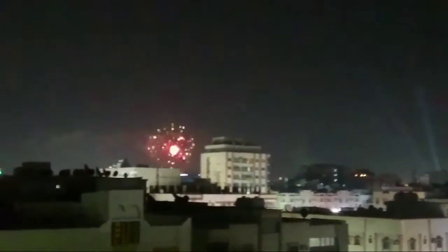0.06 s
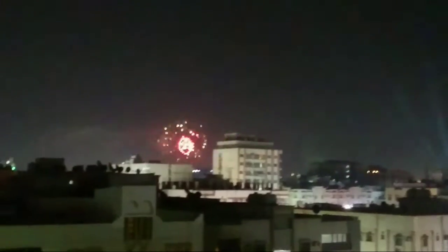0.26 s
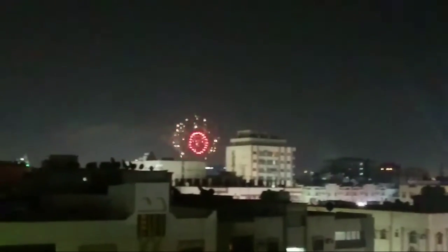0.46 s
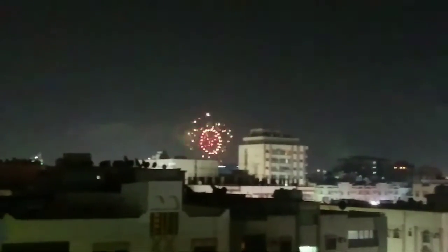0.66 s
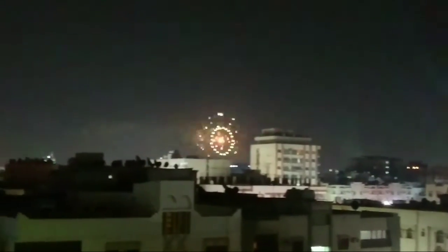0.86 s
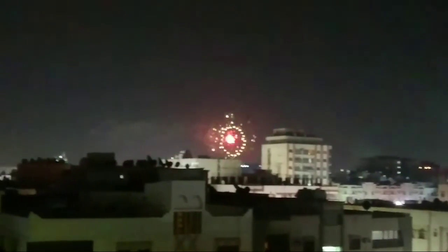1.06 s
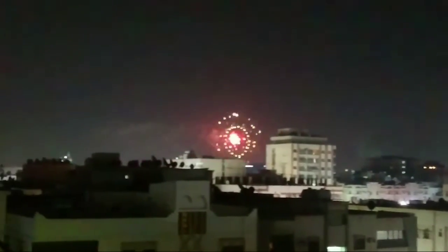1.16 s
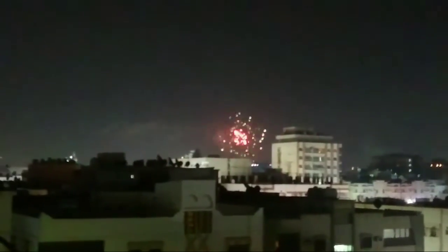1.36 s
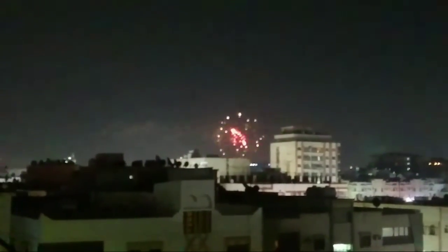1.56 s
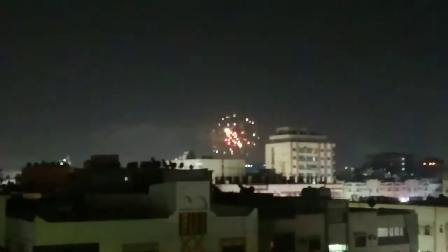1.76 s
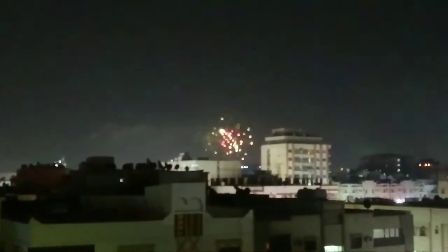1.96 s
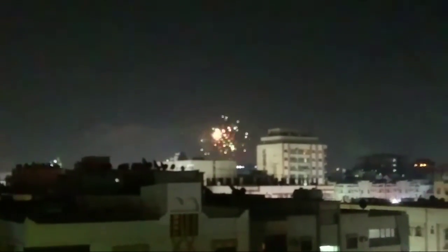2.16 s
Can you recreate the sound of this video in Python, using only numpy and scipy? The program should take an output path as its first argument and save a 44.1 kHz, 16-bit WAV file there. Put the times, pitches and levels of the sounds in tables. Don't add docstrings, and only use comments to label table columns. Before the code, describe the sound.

Far-off firework shells pop and boom in irregular clusters above faint city noise and hum

```python
import sys
import numpy as np
from scipy import signal
from scipy.io import wavfile
from scipy.ndimage import uniform_filter1d

SR = 44100
rng = np.random.default_rng(int(sys.argv[2]) if len(sys.argv) > 2 else 0)


def level_to_linear(level):
    exponent = np.asarray(level, float) / 20
    return 10 ** exponent


def to_wav(sig):
    pcm = np.clip(np.atleast_2d(sig), -1, 1) * 32767
    pcm = np.round(pcm).astype(np.int16)
    wavfile.write(sys.argv[1], SR, pcm.T)


N = 97020

# frequency_hz, density_db
WASH_SPECTRUM = [(30, -28.5), (60, -6.5), (120, -13), (600, -20), (1000, -22), (3500, -36.5), (6300, -38),
                 (8000, -48.5), (15000, -58.5)]
# frequency_hz, correlation (-1 to 1)
WASH_LIKENESS = [(60, 1), (250, -0.5), (600, 0.68), (1200, -0.46), (5000, 0.24)]
# frequency_hz, difference_db
WASH_BALANCE = [(60, -21), (600, -3.5), (2500, -2), (12000, -4)]
# order, level_db
HUM_ORDERS = [(1, -61), (2, -57), (4, -54), (5, -68), (6, -65), (7, -64), (8, -69), (9, -71), (10, -69)]
# peak_s, crack_db, thump_db, crack_length_ms,
# thump_length_ms
SHELLS = [(0.21, -20, -20.5, 0.99, 1.08), (0.2181, -10, -17.5, 0.78, 1.73),
          (0.451, -8.5, -14.5, 0.56, 1.96), (0.5211, -9, -14, 0.7, 2.12), (0.5879, -8.5, -16.5, 0.85, 1.63),
          (0.86, -13, -15.5, 0.58, 2), (.9609, -6.5, -11.5, .85, 1.7), (.9618, -10, -40, .5, 1.5),
          (1.527, -20.5, -21, .8, 1.9), (1.5573, -14, -23, 0.78, 1.63), (1.6144, -14, -18, 0.75, 1.5),
          (1.8849, -28.5, -20, 0.8, 1.9), (1.8920, -17, -27, 0.74, 1.86)]
# delay_s, level_db
CRACK_ECHOES = [
    (0, 0),
    (.0021, -15),
    (.0052, -9),
    (.0076, -11),
    (.0098, -14),
    (.0175, -20),
    (.0230, -20),
]
# delay_s, level_db
THUMP_ECHOES = [
    (.006, 2.5),
    (.017, 3.7),
    (.0335, 5),
    (.0465, 1.5),
    (.060, 0),
    (.074, -24.5),
    (.087, -16.5),
    (.100, -25.5),
    (.113, -29.5),
]
# start_s, peak_db,
# pitch_hz, t60_s
POPS = [(0.2929, -20, 910, 0.0071), (.2950, -23, 407, 0.0089), (0.579, -27, 1800, 0.0049),
        (0.7075, -47, 447, 0.017), (0.7736, -22, 594, 0.026), (0.843, -16, 471, 0.032),
        (.9350, -7.5, 790, 0.0021), (0.949, -28.5, 900, 0.013), (1.5570, -20, 1200, 0.0078),
        (1.0345, -24, 1000, .004), (1.113, -35, 500, .012), (1.1807, -15, 490, 0.0069),
        (1.2122, -12.5, 540, 0.013), (1.28, -9, 530, 0.013), (1.314, -12, 520, 0.014),
        (1.3170, -32, 2200, 0.009), (1.8484, -22.5, 526, 0.021), (1.9398, -21.5, 486, 0.019),
        (1.961, -27, 900, 0.0073), (2.0295, -25.5, 570, 0.013)]
# frequency_hz, t60_s
CITY_DECAY = [(60, 4.34), (130, 1.19), (300, 1.89), (700, 0.69), (1500, 1.05), (4000, 0.53)]
# frequency_hz, t60_s
NEAR_DECAY = [(60, 0.067), (300, 0.15), (1000, .07), (4000, 0.013)]
# frequency_hz, correlation
TAIL_LIKENESS = [(60, 0.94), (250, 0.8), (600, 0.35), (1500, 0.24), (4000, 0.3)]

WASH_DB, HUM_HZ = -47, 59.38
AIR_HZ, EDGE_HZ, EDGE_DB = 1400, 2930, -6
DAMPING, DULL_POWER = 0.37, 0.7
FAR_VOLLEY_S, FAR_VOLLEY_HZ = 1.4, 1700
SCATTER_S, SCATTER_DB = 0.00037, 1
WIDEN_PER_S = 11.4
CITY_TILT = 1.2
GRIT_DB, GRIT_T60_S, GRIT_LOW_HZ = -27, 0.048, 730
POP_PARTNER, POP_RISE_S = 0.37, 0.0027
STREET_HZ, STREET_WIDTH_HZ, STREET_DB, STREET_START_S = 75.66, 3.1, -17, 0.075
CRACK_CITY_DB, THUMP_CITY_DB, CRACK_NEAR_DB, POP_NEAR_DB = -7.5, -4, -11, 1.5
CRACK_PAN_DB, THUMP_PAN_DB, POP_PAN_DB = -3, -4.8, -3
FAR_AIR_HZ = 3600
MIC_LOW_HZ, LEFT_LEAD_S = 50, 0.00007


def read(points, hz):
    f, value = np.transpose(points)
    return np.interp(np.log(hz + 1), np.log(f + 1), value)


def evened(x):
    return x / np.sqrt(np.mean(x ** 2) + 1e-20)


def add(mix, start_s, sound):
    part = mix[..., max(round(start_s * SR), 0):][..., :sound.shape[-1]]
    part += sound[..., :part.shape[-1]]


def pan(x, db):
    return x * level_to_linear(np.array([[db / 2], [-db / 2]]))


def low(x, hz, order=2):
    return signal.sosfilt(signal.butter(order, hz, fs=SR, output="sos"), x)


def pair(frames, likeness, field_db):
    a, b, c, d = rng.standard_normal((frames, 513, 4)).T
    likeness = np.clip(likeness, -1, 1)[:, None]
    left = a + 1j * b
    right = likeness * left + np.sqrt(1 - likeness ** 2) * (c + 1j * d)
    z = np.array([left, right])
    return signal.istft(z * level_to_linear(field_db), nperseg=1024, noverlap=768)[1]


def wash():
    frames, hz = N // 256 + 5, np.fft.rfftfreq(1024, 1 / SR)
    patches = rng.standard_normal((frames, 513)).T
    patches = uniform_filter1d(patches, 12, 0)
    patches = evened(uniform_filter1d(patches, 14, 1))
    sides = np.array([0.5, -0.5])[:, None, None]
    field_db = read(WASH_SPECTRUM, hz)[:, None] + 0.49 * patches
    field_db = field_db + read(WASH_BALANCE, hz)[:, None] * sides
    out = pair(frames, read(WASH_LIKENESS, hz), field_db)
    return level_to_linear(WASH_DB + 4.0) * evened(out[:, :N])


def hum():
    t, out = np.arange(N) / SR, np.zeros(N)
    for (order, db), (phase, waver_phase, rate) in zip(HUM_ORDERS, rng.random((len(HUM_ORDERS), 3))):
        waver_db = 4.9 * np.sin(2 * np.pi * (3.4 * rate * t + waver_phase))
        tone = np.sin(2 * np.pi * (round(order) * HUM_HZ * t + phase))
        out += level_to_linear(db + 4 + waver_db) * tone
    return pan(out, -5.5)


def crack(ms):
    u = (np.arange(0, 0.022, 1 / SR) - 0.002) / (ms / 1000)
    blast = (u >= 0) * np.cos(np.pi * u / 2) * np.exp(-DAMPING * u)
    dull = (ms / 0.44) ** -DULL_POWER
    body = signal.sosfiltfilt(signal.butter(2, AIR_HZ * dull, fs=SR, output="sos"), blast)
    wave = body + level_to_linear(EDGE_DB) * low(blast, EDGE_HZ * dull, order=4)
    return wave / wave.max()


def thump(ms):
    u = (np.arange(0, 0.04, 1 / SR) - 0.02) / (ms / 1000)
    return (1 - u ** 2) * np.exp(-u ** 2 / 2)


def shells():
    cracks, thumps, bare, deep = np.zeros((4, N))
    chance = rng.standard_normal((len(SHELLS), 4, 10))
    for (s, crack_db, thump_db, crack_ms, thump_ms), c in zip(SHELLS, chance):
        wave = level_to_linear(crack_db) * crack(crack_ms)
        if s > FAR_VOLLEY_S:
            wave = low(wave, FAR_VOLLEY_HZ)
        start = s - np.argmax(wave) / SR
        add(bare, start, wave * (crack_ms / 0.55) ** -CITY_TILT)
        add(deep, s, level_to_linear(thump_db) * thump(thump_ms))
        for k, (delay, db) in enumerate(CRACK_ECHOES):
            echoed = k > 0
            level_db = db + echoed * SCATTER_DB * c[1, k]
            add(cracks, start + delay + echoed * SCATTER_S * c[0, k], wave * level_to_linear(level_db))
        for k, (delay, db) in enumerate(THUMP_ECHOES):
            push = thump(thump_ms * (1 + WIDEN_PER_S * delay))
            level_db = thump_db + db + SCATTER_DB / 2 * c[3, k]
            add(thumps, s - 0.02 + delay + SCATTER_S * c[2, k], push * level_to_linear(level_db))
    return cracks, thumps, bare, deep


def grit():
    out, t = np.zeros((2, N)), np.arange(0, 0.05, 1 / SR)
    for s, crack_db, _, ms, _ in SHELLS:
        top_hz = max(EDGE_HZ * (ms / 0.51) ** -DULL_POWER, GRIT_LOW_HZ + 300)
        spikes = rng.standard_normal((2, len(t))) * (rng.random(len(t)) < 0.03)
        band_pass = signal.butter(2, [GRIT_LOW_HZ, top_hz], "band", fs=SR, output="sos")
        band = evened(signal.sosfilt(band_pass, spikes))
        rise = np.minimum(t / 0.0022, 1)
        add(out, s, band * rise * level_to_linear(crack_db + GRIT_DB - 60 * t / GRIT_T60_S))
    return pan(out, -2.9)


def tail(decays, build_s):
    hz = np.fft.rfftfreq(1024, 1 / SR)
    noise = pair(260, read(TAIL_LIKENESS, hz), np.zeros((513, 1)))[:, 1024:]
    f, t, z = signal.stft(noise, SR, nperseg=512)
    decay_db = -60 * t / read(decays, f)[:, None]
    out = signal.istft(z * level_to_linear(decay_db), SR, nperseg=512)[1]
    out = out * np.minimum(np.arange(out.shape[1]) / SR / build_s, 1)
    return out / np.linalg.norm(out[0])


def street(deep):
    t = np.arange(0, 0.5, 1 / SR)
    onset = np.clip((t - STREET_START_S) / 0.012, 0, 1)
    ring = np.sin(2 * np.pi * STREET_HZ * t) * np.exp(-np.pi * STREET_WIDTH_HZ * t) * onset
    return level_to_linear(STREET_DB) * signal.fftconvolve(deep, ring / np.linalg.norm(ring))[:N]


def pops():
    out, t = np.zeros((2, N)), np.arange(0, 0.03, 1 / SR)
    for (s, db, hz, t60), (p, phase) in zip(POPS, rng.random((len(POPS), 2))):
        partner_hz = hz * (0.66 + 0.7 * p)
        tone = np.sin(2 * np.pi * hz * t)
        tone += POP_PARTNER * np.sin(2 * np.pi * (partner_hz * t + phase))
        rise = np.minimum(t / min(POP_RISE_S, t60 / 6), 1) ** 2
        add(out, s - 0.001, pan(rise * level_to_linear(db - 60 * t / t60) * tone, POP_PAN_DB))
    return out


def scene():
    cracks, thumps, bare, deep = shells()
    city, near, slaps = tail(CITY_DECAY, 0.03), tail(NEAR_DECAY, 0.0033), pops()
    far_send = level_to_linear(CRACK_CITY_DB) * bare + level_to_linear(THUMP_CITY_DB) * deep
    near_send = bare + level_to_linear(POP_NEAR_DB) * slaps.mean(0)
    wet = signal.fftconvolve(far_send[None], city, axes=1)[:, :N]
    wet += level_to_linear(CRACK_NEAR_DB) * signal.fftconvolve(near_send[None], near, axes=1)[:, :N]
    booms = pan(cracks, CRACK_PAN_DB) + slaps + grit()
    booms += pan(thumps + street(deep), THUMP_PAN_DB) + pan(wet, -2.5)
    return low(booms, FAR_AIR_HZ, order=3) + wash() + hum()


def roll_off(x):
    return signal.sosfilt(signal.butter(12, 15000, fs=SR, output="sos"), x)


def record(dry):
    high_pass = signal.butter(4, MIC_LOW_HZ, "high", fs=SR, output="sos")
    mix = signal.sosfiltfilt(high_pass, dry)
    mix[1] = np.roll(mix[1], round(LEFT_LEAD_S * SR))
    return roll_off(mix)


dry = scene()
out = record(dry)
to_wav(out)
```